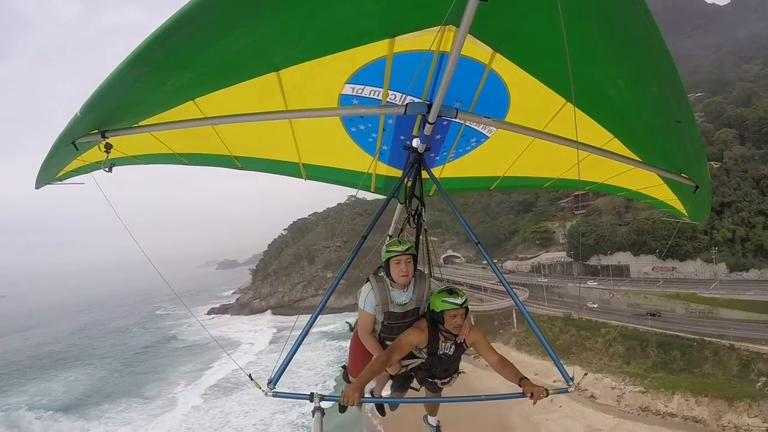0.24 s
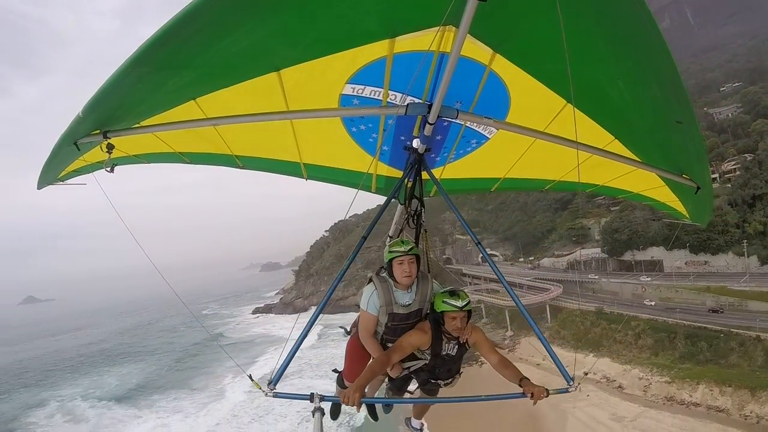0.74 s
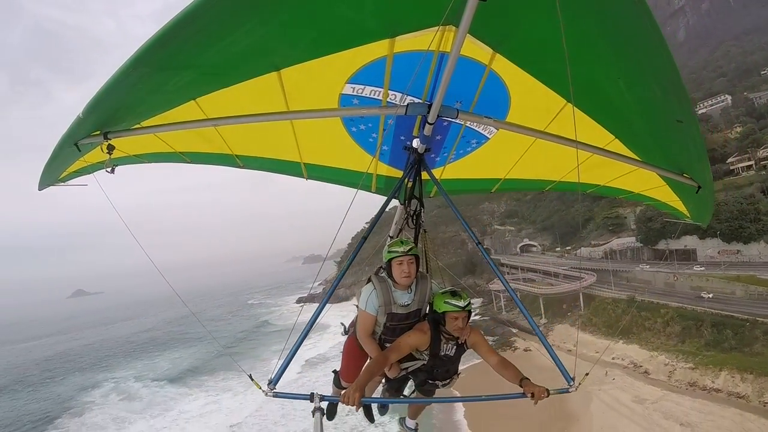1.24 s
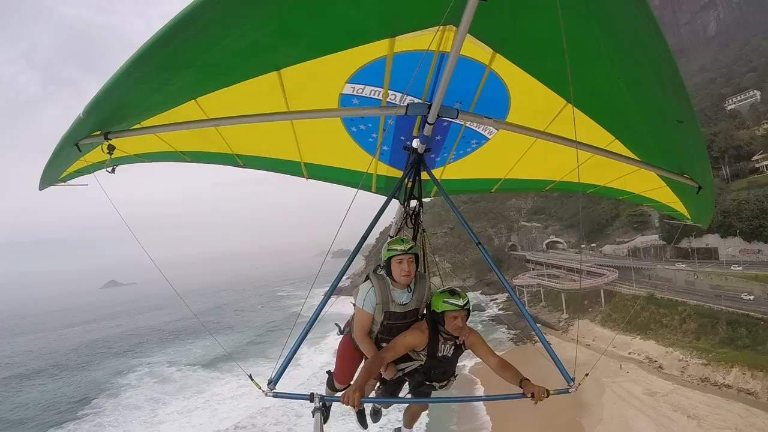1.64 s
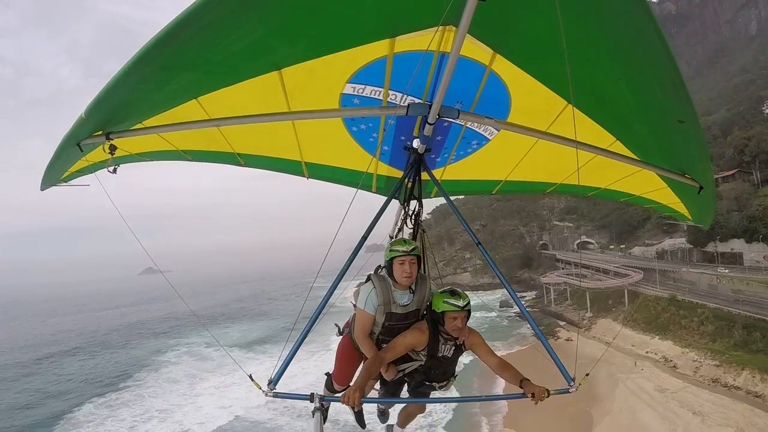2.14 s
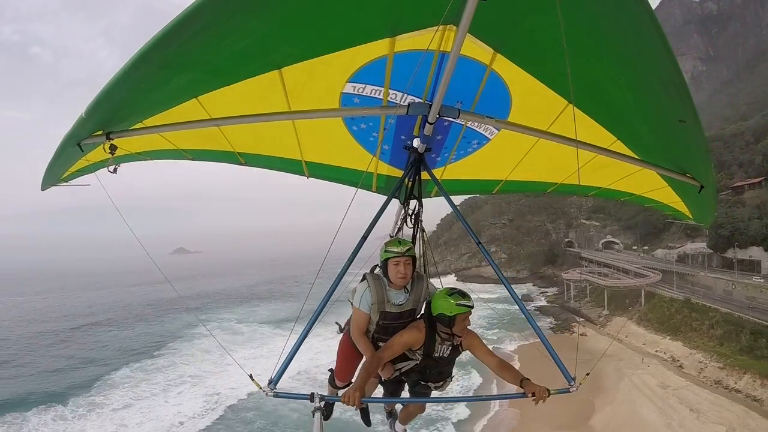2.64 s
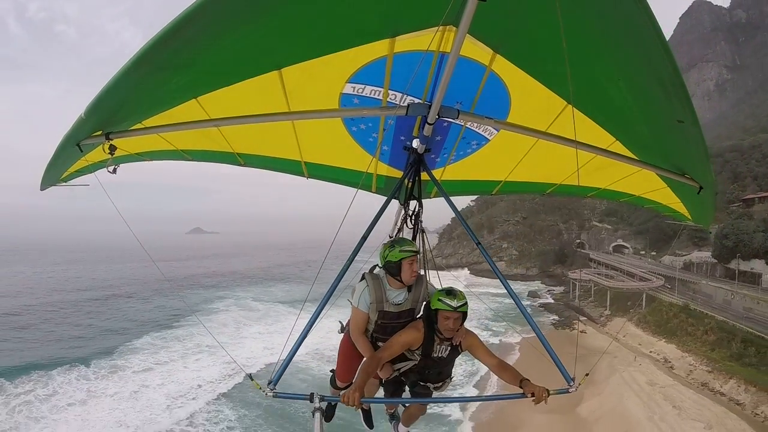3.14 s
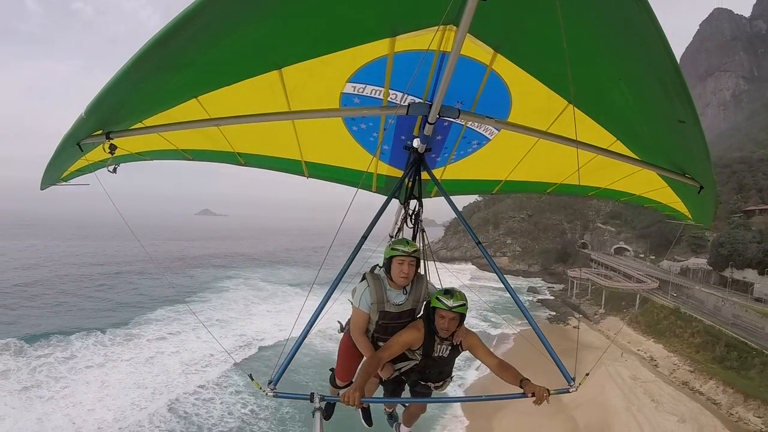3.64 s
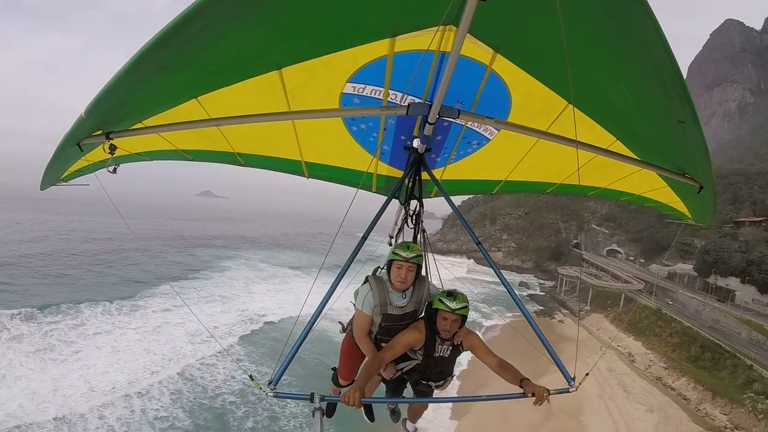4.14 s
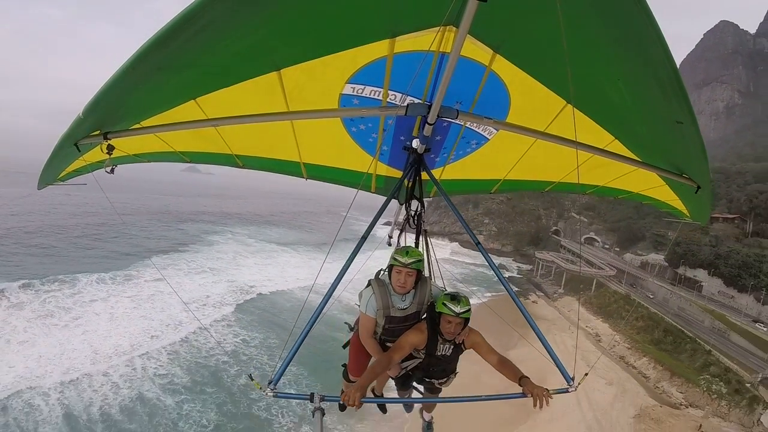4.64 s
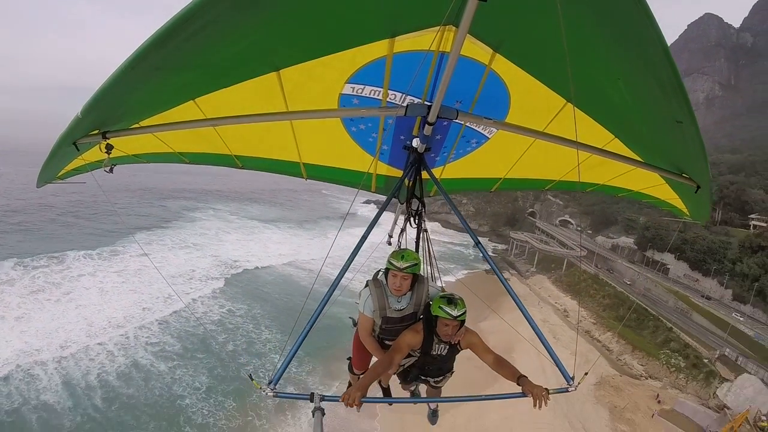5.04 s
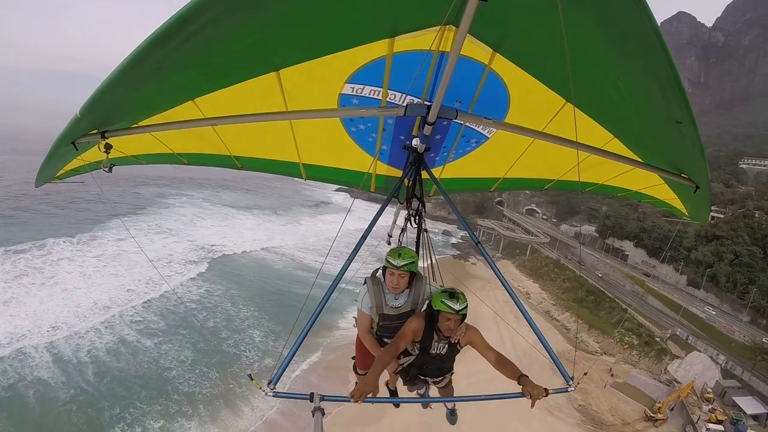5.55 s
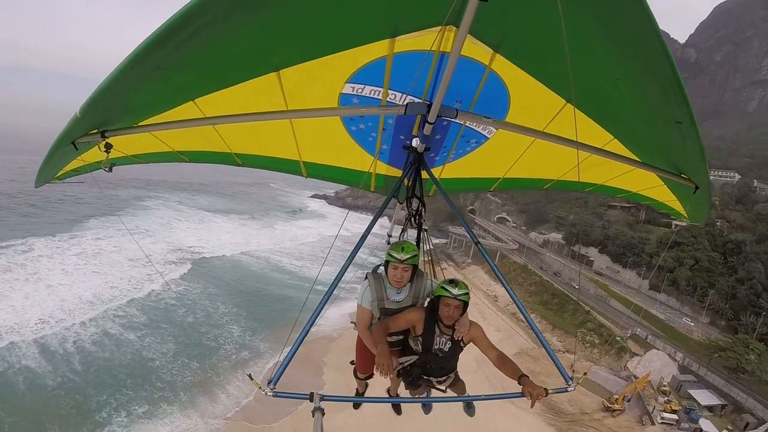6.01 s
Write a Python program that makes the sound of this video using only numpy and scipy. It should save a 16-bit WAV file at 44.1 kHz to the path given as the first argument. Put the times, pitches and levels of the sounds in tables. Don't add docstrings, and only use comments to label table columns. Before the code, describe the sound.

The microphone rides on a hang glider's frame in strong wind, outdoors with no echo. Throughout, a very deep rumble dominates, throbbing irregularly about ten or so times a second, its peaks squashed and dense. Low frame tubes hum and shudder with passing gusts, and a much quieter roar and dull hiss of air lie behind, slightly stronger at the start, easing around 1.6 to 2.3 s, briefly brighter near 2.7 s, and duller but a little fuller by the end. Soft, short, hollow knocks from a loose fitting scatter from 0.2 to 1.4 s. A firm rap comes at 2.1 s and the hardest at 2.45 s. No knocks follow until 4.5 s; the rumble sags sharply near 3.6 s. From 4.5 s the taps return, clustering busily around 4.9 to 5.4 s and again around 5.7 to 6.1 s. The bass weakens somewhat near 6 s, and wind continues to the cut at about 6.3 s.

```python
import sys
import numpy as np
from scipy import signal
from scipy.fft import rfft, irfft, next_fast_len
from scipy.io import wavfile
from scipy.ndimage import uniform_filter1d, map_coordinates

SR = 44100
rng = np.random.default_rng(int(sys.argv[2]) if len(sys.argv) > 2 else 0)


def level_to_linear(level):
    exponent = np.asarray(level, float) / 20
    return 10 ** exponent


def store_wav(level_fs):
    pcm = np.round(np.clip(np.atleast_2d(level_fs), -1, 1) * 32767)
    wavfile.write(sys.argv[1], SR, pcm.T.astype(np.int16))


N = 276864


def unit(x):
    return x / np.sqrt(np.mean(x ** 2) + 1e-20)


def curves(rows):
    s, *columns = np.transpose(rows)
    return [np.interp(np.arange(N) / SR, s, column) for column in columns]


def wobble(rate):
    knots = rng.standard_normal(int(N * rate / SR) + 4)
    return map_coordinates(knots, [np.arange(N) * rate / SR])


def filtered(x, response):
    m = next_fast_len(N + SR // 2)
    return irfft(rfft(x, m) * response(np.fft.rfftfreq(m, 1 / SR)), m)[:N]


def rush(spectrum, patchy_db):
    z = signal.stft(rng.standard_normal(N), nperseg=512)[2]
    patches = uniform_filter1d(rng.standard_normal(z.shape), size=6, axis=0)
    patches = uniform_filter1d(patches, size=14, axis=1)
    noise = signal.istft(z * level_to_linear(patchy_db * unit(patches)), nperseg=512)[1][:N]
    hz, db = np.transpose(spectrum)
    return unit(filtered(noise, lambda f: level_to_linear(np.interp(np.log(f + 1), np.log(hz + 1), db))))


def tubes(modes, steady):
    def response(f):
        power = sum(level_to_linear(db) ** 2 / (1 + (2 * (f - hz) / width) ** 2) ** 2 for hz, width, db in modes)
        return np.sqrt(power)

    hum = filtered(rng.standard_normal(N), response)
    swell = np.abs(uniform_filter1d(hum ** 2, size=3000))
    return unit(hum / swell ** (steady / 2))


# [t/s, strength level/dB, brightness level/dB]
AIR_FLOW = [(0, -35.5, 1.5), (.3, -37, 1.3), (.75, -38, 0.6), (1.15, -38, -0.2), (1.6, -42, -0.3),
            (2.15, -42.5, -0.3), (2.42, -40, 0), (2.75, -41, 2.3), (3.05, -41.5, 1.2), (3.4, -42.5, -0.1),
            (3.85, -39.5, -.7), (4.3, -40.5, 0.1), (4.7, -40, -1.2), (5.1, -41, -1), (5.8, -39, -1.5),
            (6.28, -37.5, -2.3)]


def flow():
    strength_db, bright_db = curves(AIR_FLOW)
    return strength_db, strength_db - strength_db.mean(), bright_db


# [t/s, rise of low tubes level/dB, of high tubes level/dB,
# of top tube level/dB]
EDDY_STRIKES = [(0.031, 6.5, -3.5, 8), (.16, 2, 1, 4.5), (0.299, 6.5, -0.5, -1), (0.429, 6.5, 10.5, 0.5),
                (.58, 5, 4, 3.5), (0.7, 9.5, 4, 9), (0.839, 0.5, 3.5, 2.5), (1.0, 2.5, 7.5, 8.5),
                (1.1, -3, 1, 6.5), (1.21, 9, 4.5, 3.5), (1.36, 9.5, 1, -1.5), (1.5, 0.5, 0.5, 0.5),
                (1.65, -1, -1.5, 0), (1.8, 0, 2.5, 1), (2.0, -1, 0.5, 5.5), (2.22, 3.5, 6.5, 2.5),
                (2.38, -3.5, 6, -4), (2.511, 6.5, 8.5, 5.5), (2.68, 1, 5, -1.5), (2.76, 1.5, 4.5, 3),
                (2.9, -1.5, 6.5, 2), (3.1, 1.5, -2, -0.5), (3.28, 3.5, 0.5, 5), (3.501, 4, -3.5, 7),
                (3.579, 0, 9, -4.5), (3.7, 6, 3, -3), (3.8, 4, 6, 4), (3.93, 8, 7.5, 4.5),
                (4.1, 7, 1, -0.5), (4.22, 2, 1, 0.5), (4.349, 4.5, 1, 7.5), (4.582, 5, 3, -1.5),
                (4.67, 3.5, 3.5, 0.5), (4.75, 0.5, 2, 2.5), (4.88, 0.5, 6, -2.5), (5.02, 1.5, 7.5, 0.5),
                (5.12, 2, 7, 5.5), (5.3, 7.5, 3, 0), (5.439, 4.5, 0, -1.5), (5.56, 8.5, 4, 4),
                (5.66, 4, 4.5, -4.5), (5.76, -1.5, 8.5, 8), (5.88, 1, 3, 3.5), (6, 3.5, 9.5, 3.5),
                (6.17, 6, 8.5, 9), (6.27, 8.5, -2.5, 6.5)]


def eddies():
    t = np.arange(N) / SR
    half_s = 0.061
    return sum(np.outer(rise_db, np.exp(-((t - s) / half_s) ** 2)) for s, *rise_db in EDDY_STRIKES)


# [f/Hz, spectral level/dB]
HISS_SPECTRUM = [(650, -16.5), (1100, -2.5), (2950, -10.5), (4550, -18.5), (6500, -20.5), (7200, -23),
                 (8000, -28.5), (10000, -40), (11000, -44), (13000, -49.5), (15000, -53), (18000, -120)]


def hiss(flow_db, bright_db, gust):
    air = level_to_linear(flow_db + 0.5 + 0.25 * gust + 0.28 * wobble(14)) * rush(HISS_SPECTRUM, patchy_db=0.0)
    bright_hz = 4200
    treble = filtered(air, lambda f: f ** 4 / (f ** 4 + bright_hz ** 4))
    return air + (level_to_linear(bright_db) - 1) * treble


# [f/Hz, spectral level/dB]
ROAR_SPECTRUM = [(140, -19), (240, -6.5), (258, -5.5), (360, -8), (412, -5.5), (449, -6), (527, -8.5),
                 (1000, -13.5), (1600, -22.5), (2080, -27), (3520, -120)]


def roar(extra_db, top_db, gust):
    level_db = -30 + 0.68 * extra_db + 0.047 * top_db + 0.55 * gust
    return level_to_linear(level_db) * rush(ROAR_SPECTRUM, patchy_db=0.4)


# [f/Hz, width f/Hz, level/dB]
TOP_TUBE_MODES = [
    (231.2, 7.9, 5),
    (266, 56, -11),
]


def top_tube_hum(extra_db, top_db):
    return level_to_linear(-37 + 0.18 * extra_db + top_db) * tubes(TOP_TUBE_MODES, steady=0.44)


# [f/Hz, width f/Hz, level/dB]
HIGH_TUBE_MODES = [
    (136.1, 7.4, 0.5),
    (159.2, 21, -8.5),
    (180, 110, -16),
]


def high_tube_hum(extra_db, high_db):
    level_db = -30 + 0.18 * extra_db + high_db + 0.49 * wobble(6.4)
    return level_to_linear(level_db) * tubes(HIGH_TUBE_MODES, steady=0.56)


# [f/Hz, width f/Hz, level/dB]
LOW_TUBE_MODES = [
    (24.3, 12, -1.5),
    (53.1, 9.7, -1.5),
    (72.7, 3.9, -4),
    (83.74, 6.3, 2.5),
    (99, 51, -13),
]


def buffeting(low_db, gust):
    return level_to_linear(-21 + low_db + 0.16 * gust) * tubes(LOW_TUBE_MODES, steady=0.84)


# [t/s, peak level/dB, upper ring level/dB, pitch f/Hz]
SOFT_KNOCKS = [(0.22, -30.5, 4, 443), (0.455, -22, -11.5, 440), (0.595, -22, -1, 434),
               (0.704, -19.5, -5, 458), (0.877, -19, -9.5, 459), (1.085, -22, -15, 452),
               (1.172, -23, -10, 440), (1.437, -26, -6, 425), (2.122, -26, -11, 477),
               (2.278, -23, -13.5, 460), (4.523, -23, -13.5, 447), (4.613, -21.5, -3.5, 389),
               (4.63, -19.5, -5.5, 400), (4.72, -25, -8, 444), (4.8, -23, -6.5, 400),
               (4.918, -18, -18.5, 474), (4.926, -16, -11.5, 496), (4.935, -22.5, -9.5, 484),
               (4.96, -25, -6.5, 430), (5.043, -14, -17, 480), (5.126, -18.5, -14, 412),
               (5.136, -18.5, -14, 410), (5.163, -25, -19, 437), (5.2, -14.5, -17, 475),
               (5.313, -24, -13, 426), (5.364, -17, -13.5, 475), (5.415, -33.5, -3.5, 417),
               (5.512, -26, -10.5, 417), (5.743, -20.5, -15.5, 440), (5.759, -21.5, -13, 447),
               (5.924, -18, -7, 455), (5.962, -20, -15, 440), (5.985, -21.5, -13.5, 455),
               (6.019, -21.5, -13.5, 482), (6.044, -23.5, -2, 484), (6.08, -23, -8, 450),
               (6.092, -17.5, -11, 423)]
# [multiple of its pitch, level/dB, decay t60/s]
UPPER_RING = [
    (0.971, 4, 0.091),
    (1.12, 6, 0.061),
    (.82, -1.5, 0.019),
    (1.28, 7, 0.016),
    (1.55, -7, 0.038),
    (2.3, -13, 0.014),
]


def knocks():
    out, t = np.zeros(N + SR), np.arange(SR // 10) / SR
    lead_s, swell_s = 0.00478, 0.0025
    scuff_hz = 594
    chance = rng.standard_normal((len(SOFT_KNOCKS), len(UPPER_RING)))
    scuffs = rng.standard_normal((len(SOFT_KNOCKS), len(t)))
    band = signal.butter(2, [scuff_hz / SR, 4.3 * scuff_hz / SR], "band")
    scuffs = unit(signal.lfilter(*band, scuffs))
    swell = (t / swell_s) ** 3 * np.exp(-t / swell_s)
    for (s, db, upper_db, hz), luck, scuff in zip(SOFT_KNOCKS, chance, scuffs):
        tail = level_to_linear(-13 + upper_db / 2 - 60 * t / 0.09) * (1 - np.exp(-t / swell_s)) ** 3
        under = level_to_linear(-17 + upper_db / 2) * swell * np.cos(2 * np.pi * 0.876 * hz * t)
        low = (swell + tail) * np.sin(2 * np.pi * hz * t) + under
        upper = level_to_linear(-5.5 - 60 * t / 0.012) * scuff
        upper_hz = 1.68 * hz
        for (multiple, mode_db, t60), g in zip(UPPER_RING, luck):
            decay = level_to_linear(mode_db + 1.2 * g - 60 * t / t60)
            upper = upper + decay * np.sin(2 * np.pi * multiple * upper_hz * t)
        upper = level_to_linear(upper_db - 2.5) * (1 - np.exp(-t / 0.001)) ** 2 * upper
        start = round((s - lead_s) * SR)
        out[start:start + len(t)] += level_to_linear(db) * (low / np.abs(low).max() + upper)
    return out[:N]


# [t/s, peak level/dB, low modes level/dB, pitch factor]
HARD_RAPS = [
    (2.1015, -17, -0.5, 1.01),
    (2.4435, -10.5, -0.5, 1.0),
    (4.9195, -22.5, -10, 1.2),
    (5.124, -20, -2, 1.13),
]
# [f/Hz, level/dB, decay t60/s, lag t/s]
RAP_UPPER_MODES = [
    (710, -7, .1, 0),
    (831, -8.5, 0.064, 0),
    (780, -9, .04, 0),
    (910, -14, 0.025, 0),
    (636, -9, 0.056, 0.0067),
    (1150, -17, .012, 0.0076),
]
# [f/Hz, level/dB, decay t60/s, lag t/s]
RAP_LOW_MODES = [
    (440, -3.5, 0.078, .0035),
    (355, -11.5, 0.055, .0035),
    (506, -9, 0.073, .0035),
    (575, -14.5, .04, 0.0028),
]


def raps():
    out, t = np.zeros(N + SR), np.arange(SR // 10) / SR
    rise_s, crest_s = 0.0014, 0.003
    chance = rng.standard_normal((len(HARD_RAPS), len(RAP_UPPER_MODES) + len(RAP_LOW_MODES)))
    for (s, db, low_db, pitch), luck in zip(HARD_RAPS, chance):
        low_modes = [(hz, mode_db + low_db, t60, lag) for hz, mode_db, t60, lag in RAP_LOW_MODES]
        modes = list(RAP_UPPER_MODES) + low_modes
        for (hz, mode_db, t60, lag), g in zip(modes, luck):
            ring = (1 - np.exp(-t / rise_s)) ** 2 * np.cos(2 * np.pi * pitch * hz * (t - crest_s))
            start = round((s + lag) * SR)
            out[start:start + len(t)] += level_to_linear(db + 3 + mode_db + 0.55 * g - 60 * t / t60) * ring
    return out[:N]


# [t/s, depth level/dB, half length t/s]
BOOM_SAGS = [(0.205, 1.5, 0.0078), (0.387, 1, 0.012), (0.44, 5.5, 0.016), (0.628, 10.5, 0.032),
             (0.859, 5.5, 0.032), (1.06, 2, 0.047), (2.145, 13.5, 0.015), (2.442, -1.5, 0.03),
             (2.792, 9.5, 0.022), (2.983, 13.5, 0.011), (3.478, 3.5, 0.014), (3.589, 29, 0.04),
             (3.82, 5.5, 0.05), (4.245, 10.5, 0.0088), (4.889, 4.5, 0.02), (4.967, 1.5, 0.015),
             (5.251, 12.5, 0.018), (5.516, 6, 0.11), (5.856, 9.5, 0.025), (5.962, 6, 0.057),
             (6.235, 14.5, 0.026)]


def sags():
    t = np.arange(N) / SR
    return level_to_linear(-sum(db * np.exp(-((t - s) / half_s) ** 2) for s, db, half_s in BOOM_SAGS))


# [t/s, beats run off since the start]
BEAT_LULLS = [(0.017, 0), (0.092, 1), (0.218, 3), (0.307, 4), (0.58, 8), (0.741, 10), (0.869, 11),
              (0.975, 12), (1.102, 13), (1.279, 15), (1.386, 16), (1.465, 17), (1.673, 19), (1.76, 20),
              (1.87, 21), (2.14, 24), (2.209, 25), (2.527, 29), (2.625, 30), (2.972, 34), (3.039, 35),
              (3.156, 36), (3.209, 37), (3.472, 40), (3.783, 42), (3.868, 43), (4.0, 45), (4.095, 46),
              (4.252, 48), (4.357, 49), (4.42, 50), (4.521, 51), (4.668, 53), (4.725, 54), (4.829, 55),
              (4.896, 56), (5.06, 58), (5.124, 59), (5.341, 61), (5.5, 63), (5.56, 64), (5.691, 65),
              (5.797, 66), (5.868, 67), (6.053, 69), (6.098, 70), (6.159, 71), (6.369, 74)]
# [t/s, swing level/dB, lean towards the upper mode level/dB]
VORTEX_FEED = [(0, -11.5, -12), (.6, -9, -8.5), (.86, -8, -16), (1.0, -9.5, 16.5), (1.5, -9.5, -6),
               (2.2, -11.5, 5.5), (2.43, -12, 8.5), (2.71, -9.5, -3), (2.85, -8.5, 4.5), (3.14, -9, -12.5),
               (3.42, -9.5, 17.5), (4.0, -10.5, 8.5), (4.5, -10, -22.5), (4.99, -10.5, -1.5),
               (5.42, -10.5, -5.5), (5.72, -8.5, -15.5), (6.07, -14, 4.5), (6.28, -14, 7)]


def boom():
    swing_db, lean_db = curves(VORTEX_FEED)
    beats, = curves(BEAT_LULLS)
    share = np.arctan(level_to_linear(lean_db))
    low_hz, drift_hz = 48.73, 0.469
    low_turns = np.cumsum(low_hz + drift_hz * wobble(2.5)) / SR

    def swing(turns, part):
        strength = level_to_linear(swing_db + 0.5 + 0.41 * wobble(8.2))
        return np.sqrt(2) * part * strength * np.sin(2 * np.pi * turns)

    return swing(low_turns, np.cos(share)) + swing(low_turns + beats + 0.5, np.sin(share))


def scene():
    flow_db, extra_db, bright_db = flow()
    low_db, high_db, top_db = eddies()
    gust = wobble(10)
    air = hiss(flow_db, bright_db, gust) + roar(extra_db, top_db, gust)
    frame = top_tube_hum(extra_db, top_db) + high_tube_hum(extra_db, high_db) + buffeting(low_db, gust)
    fitting = knocks() + raps()
    return (air + frame + fitting + sags() * boom())[None]


def low_pass(x):
    return signal.sosfilt(signal.butter(12, 15700, fs=SR, output="sos"), x)


def record(dry):
    bass = filtered(dry[0], lambda f: 1 / (1 + (f / 260) ** 8))
    envelope = np.abs(signal.hilbert(bass, next_fast_len(N))[:N])
    gain = (1 + (envelope / 0.54) ** 5.6) ** (-1 / 6.4)
    gain = uniform_filter1d(gain, size=150)
    mix = (dry[0] + bass * (gain - 1))[None]
    return low_pass(mix)


dry = scene()
out = record(dry)
store_wav(out)
```